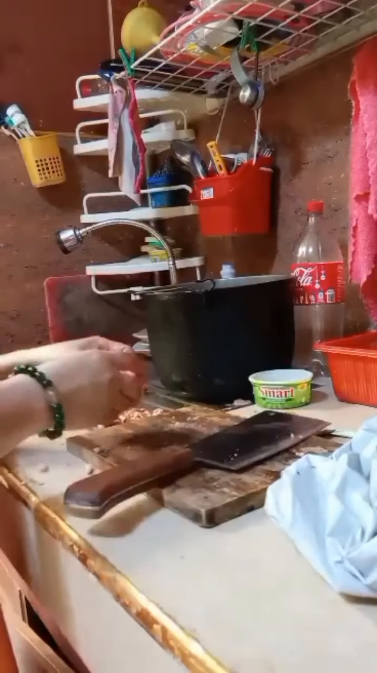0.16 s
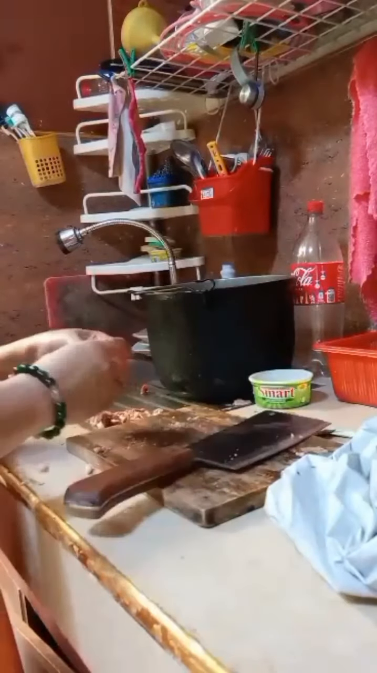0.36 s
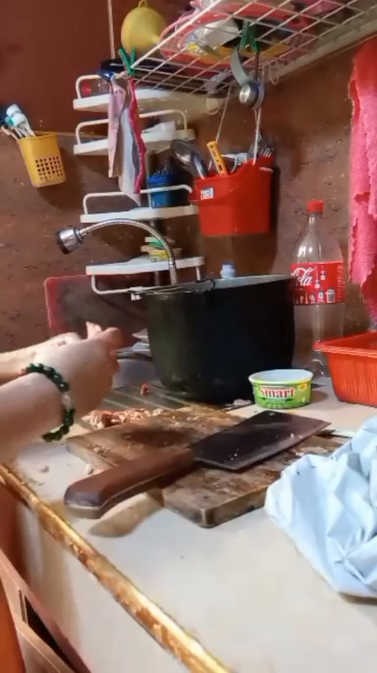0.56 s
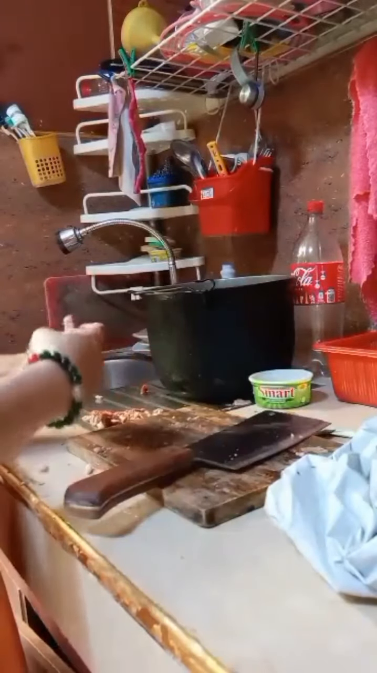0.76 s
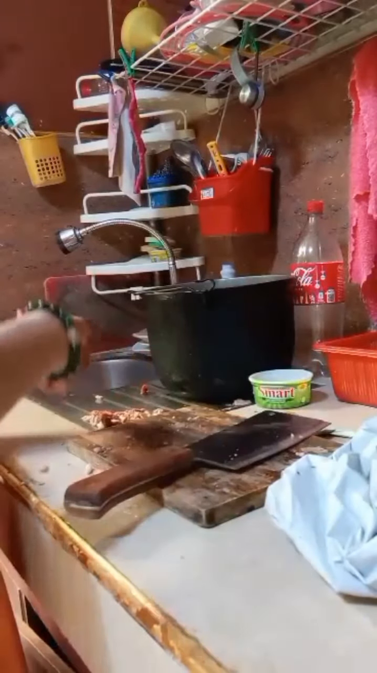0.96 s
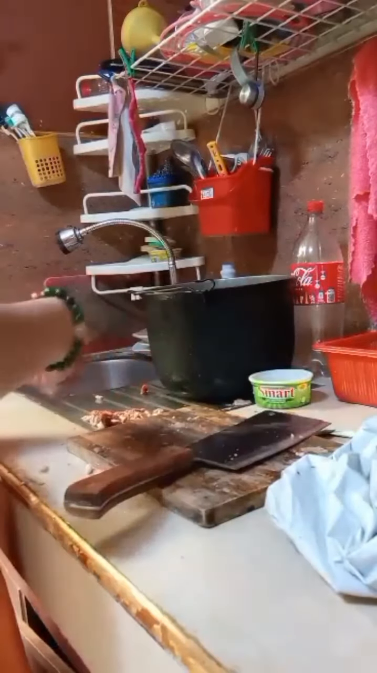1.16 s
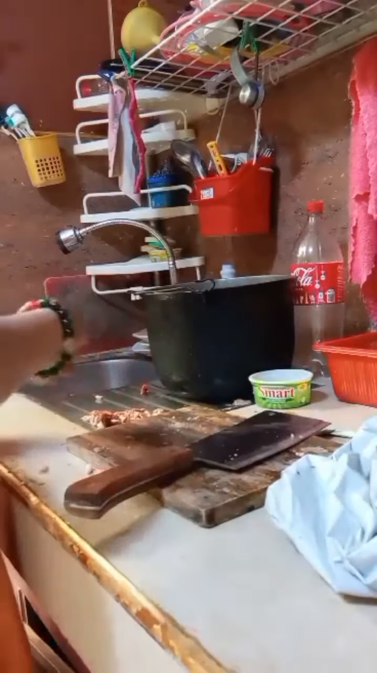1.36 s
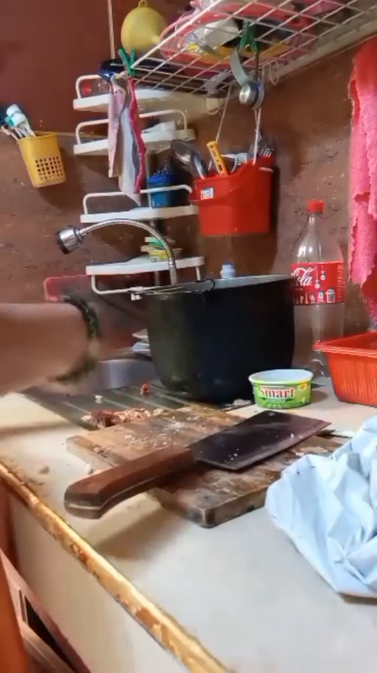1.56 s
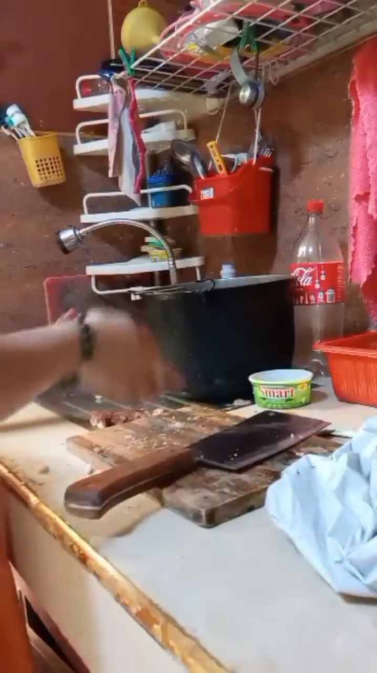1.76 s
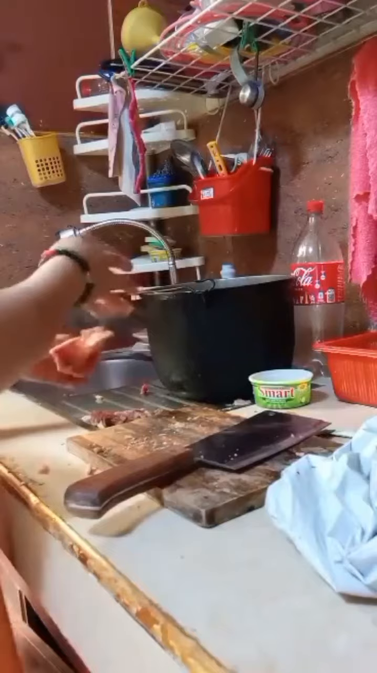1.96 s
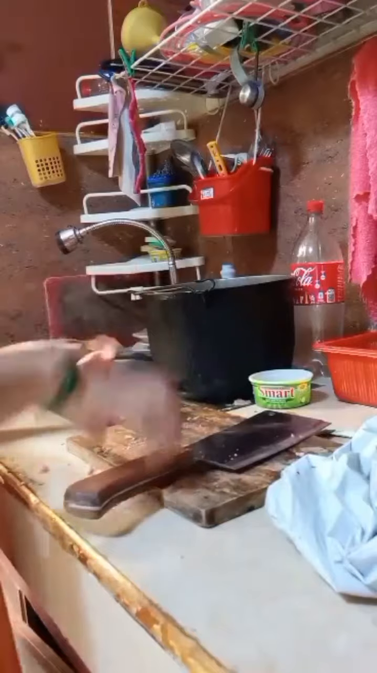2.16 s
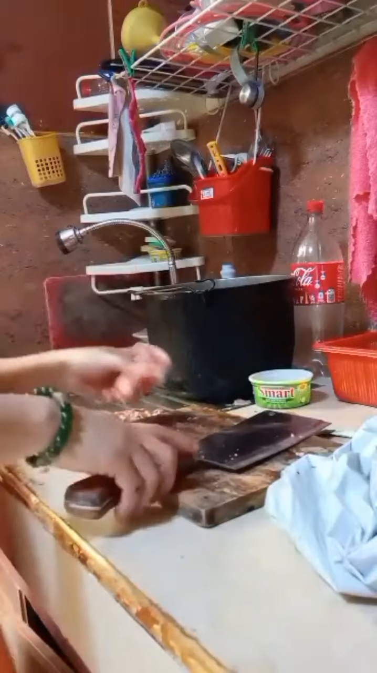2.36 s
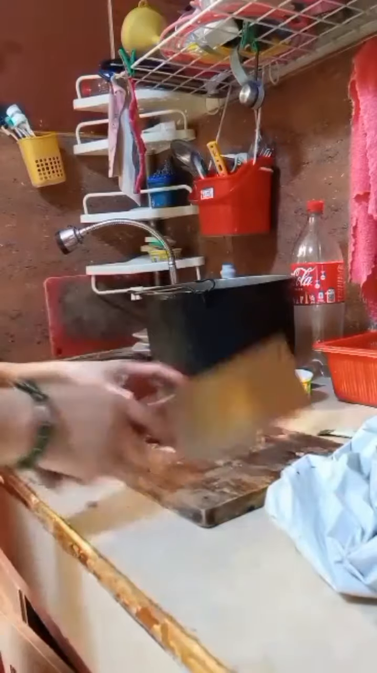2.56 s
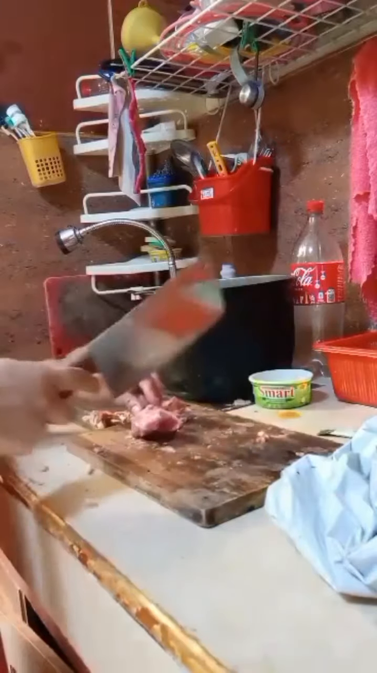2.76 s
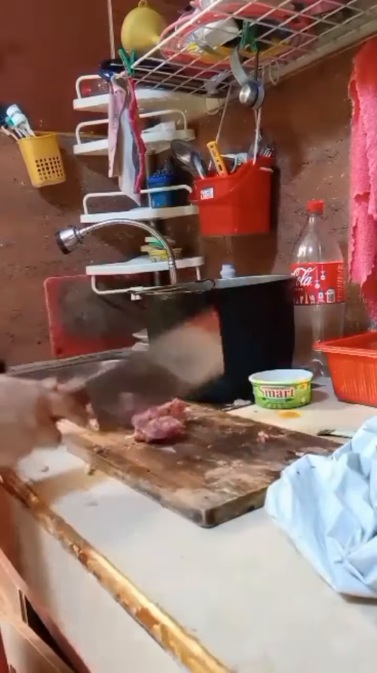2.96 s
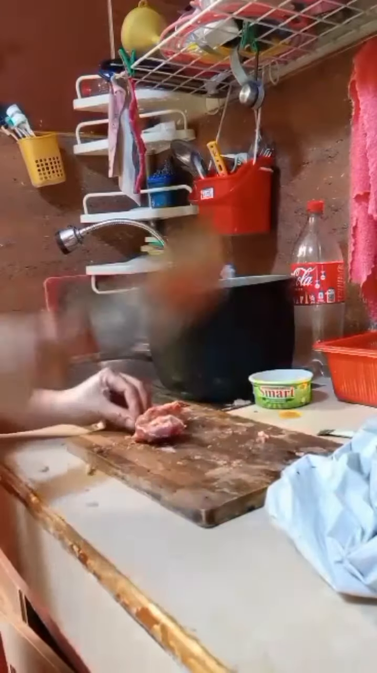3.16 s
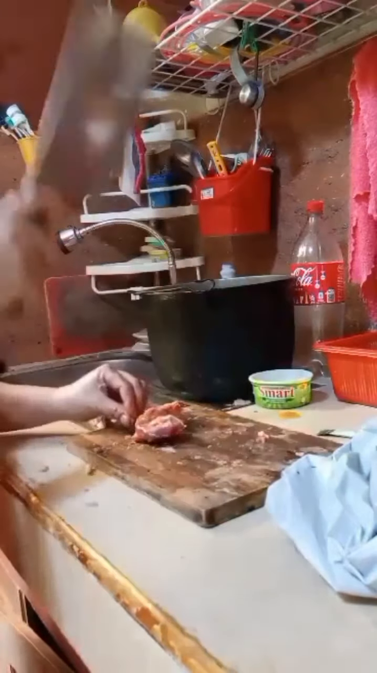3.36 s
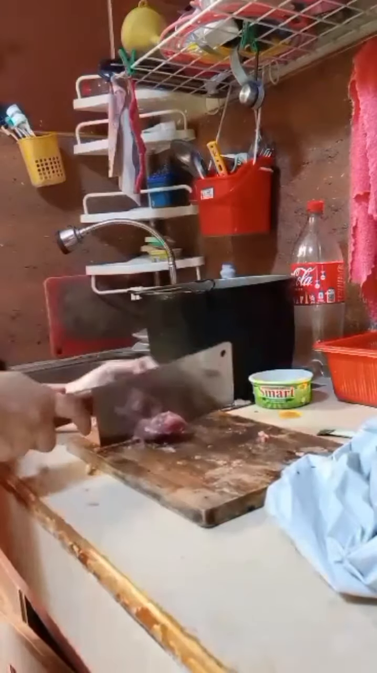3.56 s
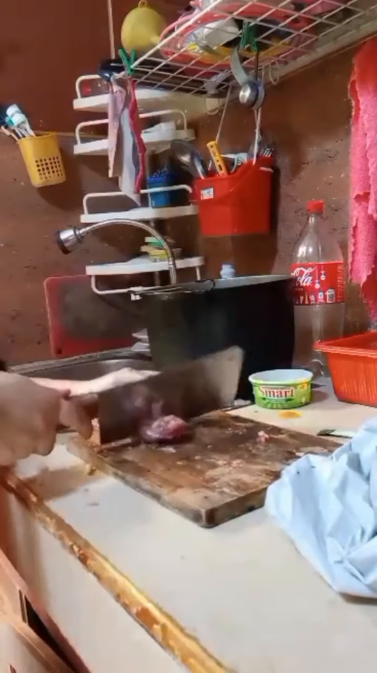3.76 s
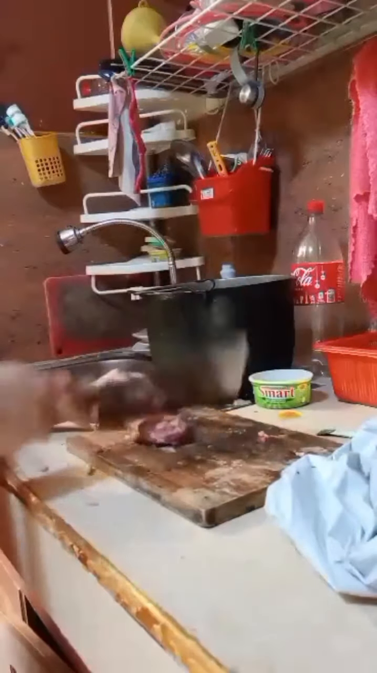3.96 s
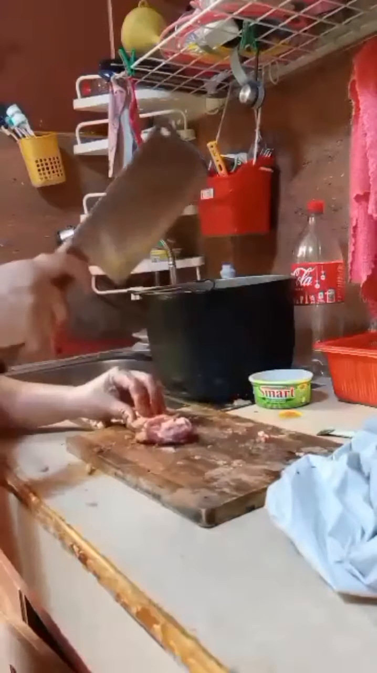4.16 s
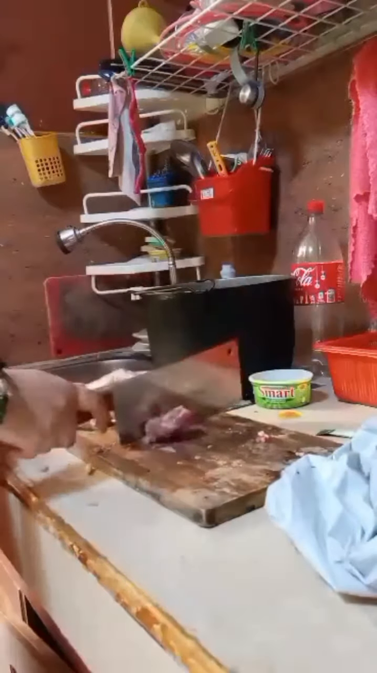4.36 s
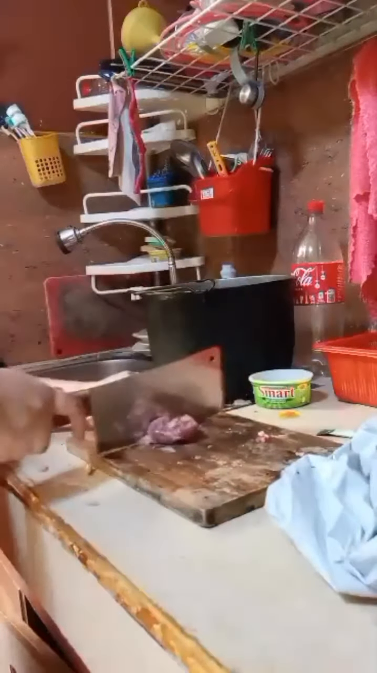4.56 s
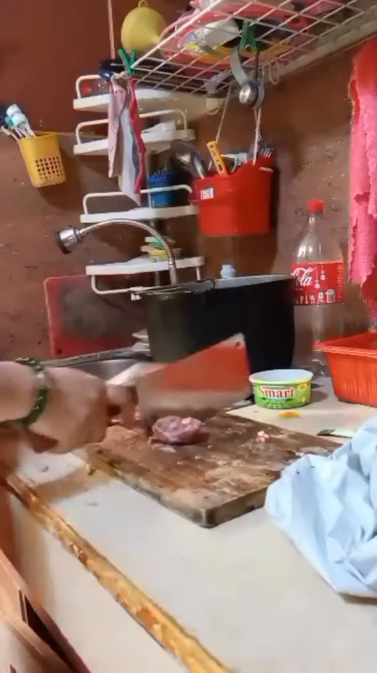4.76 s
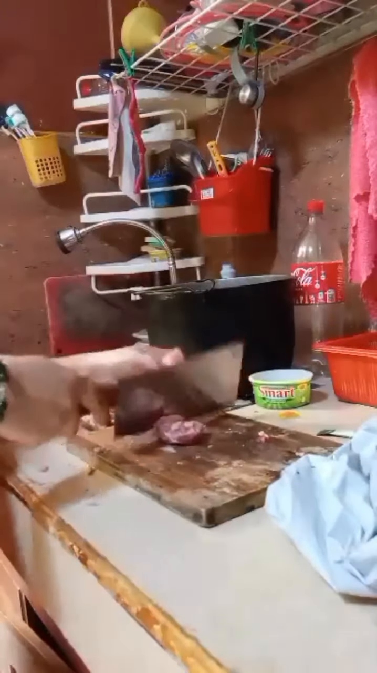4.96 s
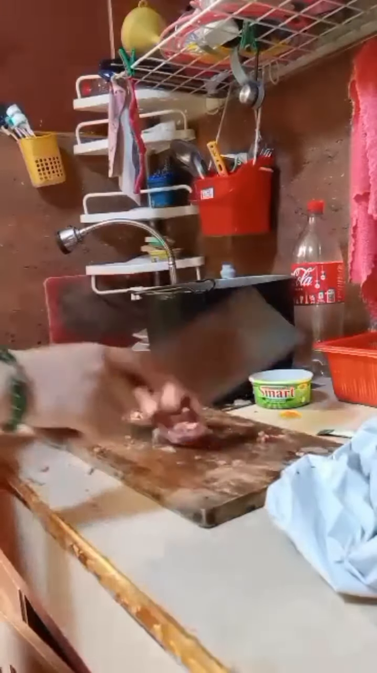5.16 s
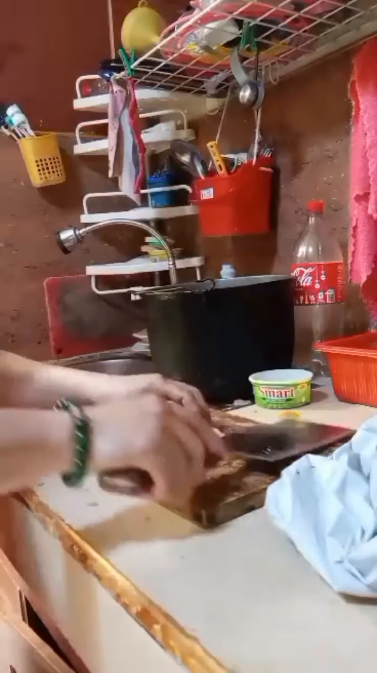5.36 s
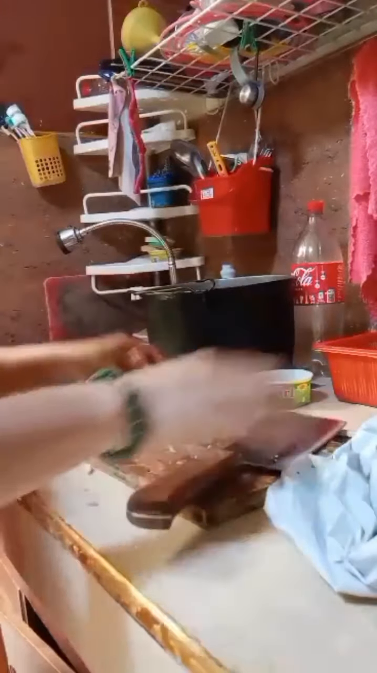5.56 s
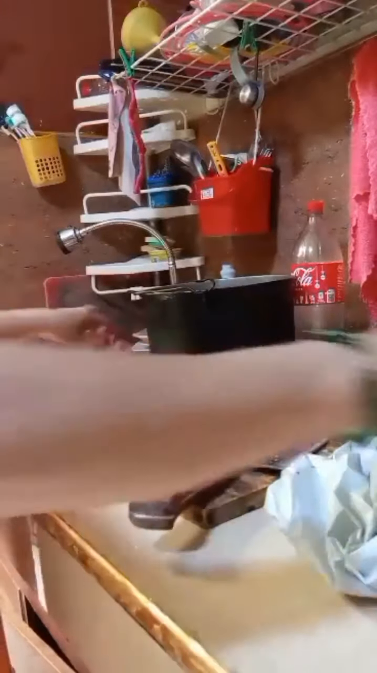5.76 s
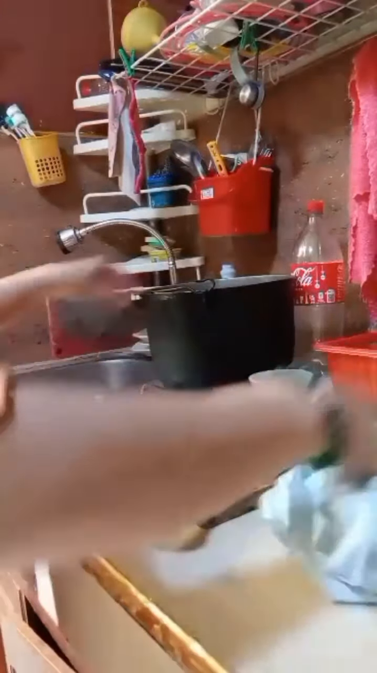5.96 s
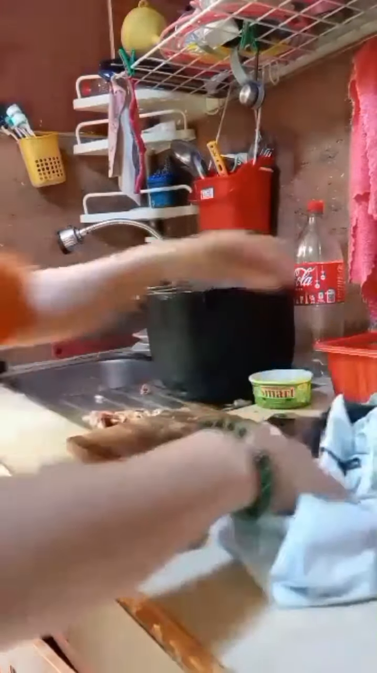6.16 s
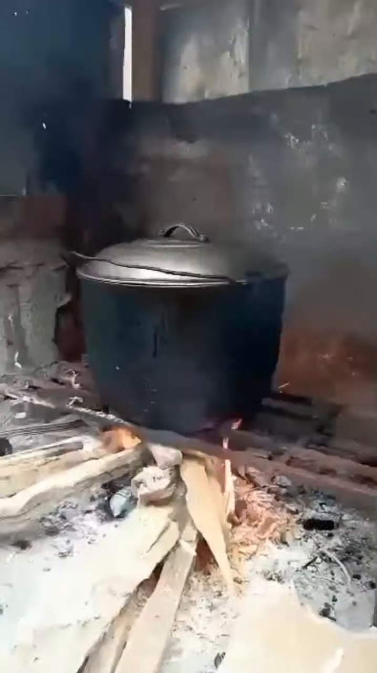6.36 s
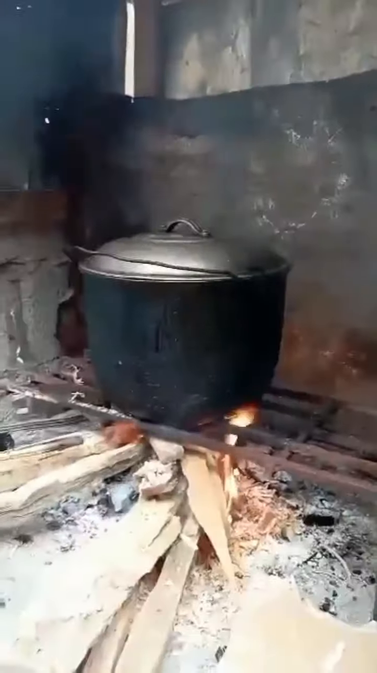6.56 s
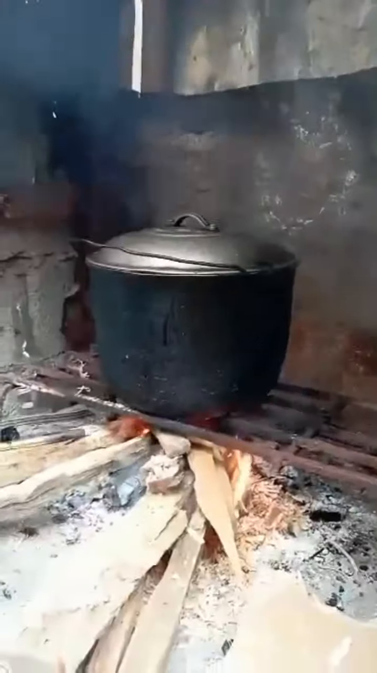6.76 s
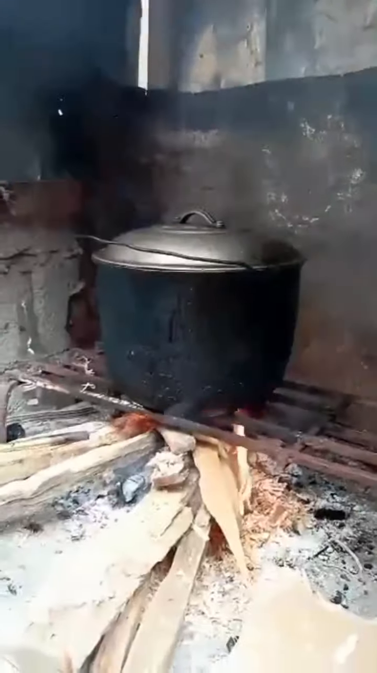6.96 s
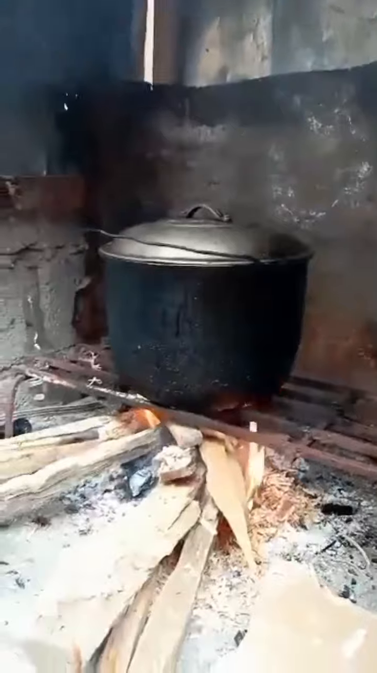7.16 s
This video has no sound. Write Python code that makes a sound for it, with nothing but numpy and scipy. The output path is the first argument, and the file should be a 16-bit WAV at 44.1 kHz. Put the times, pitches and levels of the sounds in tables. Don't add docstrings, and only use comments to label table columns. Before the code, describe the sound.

Quiet sticky handling and small clicks over low distant road rumble, heard close in a reflective kitchen. Two violent cleaver blows snap through meat and bone into a ringing board, the second slightly louder. Light scraping follows, then the cleaver clacks down and its blade rings brightly. Soft hollow bumps and crisp cloth rubbing end abruptly; a smooth, broad fire draught with faint whistles takes over.

```python
import sys
import numpy as np
from scipy import signal
from scipy.io import wavfile
from scipy.ndimage import uniform_filter1d, map_coordinates

SR = 44100
rng = np.random.default_rng(int(sys.argv[2]) if len(sys.argv) > 2 else 0)


def log_audio(samples):
    frames = np.atleast_2d(samples).T
    limited = np.clip(frames, -1, 1)
    pcm = np.round(limited * 32767).astype(np.int16)
    wavfile.write(sys.argv[1], SR, pcm)


def decibels_to_gain(level_db):
    exponent = np.asarray(level_db, float) / 20
    return 10 ** exponent


N = 318402
TIME = np.arange(N) / SR

# t/s, peak level/dB, wood/dB, knock/dB, crack/dB
CHOPS = [(0.016, -49, -35.5, -46, -36.5), (0.043, -26.5, -33, -21.5, -35), (3.581, -3, -19.5, -16, -7),
         (4.3774, -40, -19, -21, -18), (4.3842, -1, -13.5, -25, -16), (4.435, -31, -19, -35, -34),
         (4.451, -35.5, -30.5, -34, -26), (5.4496, -23.5, -37, -21.5, -20), (5.4619, -4, -34, -10, -12.5),
         (5.489, -28, -28.5, -39, -34), (5.631, -30, -29.5, -34.5, -53)]


def rms_one(x):
    return x / np.sqrt(np.mean(x ** 2) + 1e-20)


def in_time(rows, quiet=None):
    s, *columns = np.transpose(rows)
    return [np.interp(TIME, s, c, quiet, quiet) for c in columns]


def at_hz(points, hz):
    point_hz, level_db = np.transpose(points)
    return np.interp(np.log(hz), np.log(point_hz), level_db)


def swell(s, peak_db, rise, fall):
    return peak_db - 20 * np.where(TIME < s, (s - TIME) / max(rise, .003), (TIME - s) / max(fall, .003))


def drift(rate):
    r = np.exp(-80 * np.pi * rate / SR)
    slow = signal.lfilter([1], [1, -2 * r, r * r], rng.standard_normal(N // 40 + 2002))[2000:]
    return np.interp(np.arange(N) / 40, np.arange(len(slow)), rms_one(slow))


def clicks(times, sizes):
    out = np.full(N, 1e-18)
    np.add.at(out, (np.asarray(times) * SR).astype(int), sizes)
    return out


def ring(x, hz, t60):
    r, w = decibels_to_gain(-60 / (t60 * SR)), 2 * np.pi * hz / SR
    return signal.lfilter([0, np.sin(w)], [1, -2 * r * np.cos(w), r * r], x)


def die_away(x, t60):
    return signal.lfilter([1], [1, -decibels_to_gain(-60 / (t60 * SR))], x)


def narrow_band(x, hz, width_hz):
    r, w = np.exp(-np.pi * width_hz / SR), 2 * np.pi * hz / SR
    return signal.lfilter((1 - r * r) / 2 * np.array([1, 0, -1]), [1, -2 * r * np.cos(w), r * r], x)


def streaky(spread_db, width_hz, length_s):
    hz, s, cells = signal.stft(rng.standard_normal((2, N)), SR, nperseg=1024)
    places = np.meshgrid(hz / width_hz, s / length_s, indexing="ij")
    field = map_coordinates(rng.standard_normal((700, 400)), places, order=1)
    gain = decibels_to_gain(spread_db * np.clip(field, -3, 1.8))
    return signal.istft(cells * gain, SR, nperseg=1024)[1][:, :N]


def bands(source):
    for k, hz in enumerate(40 * 2 ** np.arange(1 / 6, 8.6, 1 / 3)):
        edges = hz * 2 ** (np.array([-1, 1]) / 6)
        yield hz, signal.sosfilt(signal.butter(2, edges, "band", fs=SR, output="sos"), source[k % 2])


def coloured(source, spectrum, patchy_db, rate):
    steep = [(10, -90)] + list(spectrum)
    return [(hz, decibels_to_gain(at_hz(steep, hz) + patchy_db * drift(rate)) * x) for hz, x in bands(source)]


def between(layers, low_hz, high_hz):
    return rms_one(sum(x for hz, x in layers if low_hz < hz < high_hz))


def blows():
    # f/Hz, with the thud first
    colour_hz = [140, 500, 1900, 6500, 13000]
    # f/Hz, blade laid down/dB, first chop/dB, second chop/dB, t60/s
    board = [(137.1, 11, 16.5, 11, 0.46), (254, 1.5, -1.5, -0.5, 0.4), (367, -16, -11, 1, 0.5),
             (420.5, -21, -13.5, -2.5, 0.44), (483.7, -16, -18, -9, 0.27), (629, -8.5, -9.5, 1.5, 0.4),
             (644, -9, -8.5, -4, 0.53), (738, -6, 1.5, -1, 0.46), (852, 0, -11.5, -9.5, 0.3),
             (1020, 1, -3, -12, 0.29), (760, -7, -2.5, -5, 0.4), (1150, -7, -10.5, -1, 0.16),
             (1453, -3, 0, -1.5, 0.15)]
    # f/Hz, level/dB, t60/s
    gripped = [(1674, -17, 0.04), (2630, -9, 0.17), (3480, -6.5, 0.31), (4930, -20, 0.13), (5850, -8, 0.15),
               (6640, -8, 0.3)]
    # f/Hz, first laid down/dB, first chop/dB, second chop/dB,
    # second laid down/dB
    spots = [(201, 3, -1.5, -3, -4), (349.6, 3, 0.3, 2, 1.7), (552.5, -5, -3.5, 0, 0.8),
             (900, 3.5, 1.5, -2.5, 1), (1500, -5, -0.5, 2, -1), (2750, 0, 0.8, -0.5, 0.2),
             (8000, -2, -0.7, 0.7, 0.5), (12600, -4, -1, -5.5, -8.5)]
    # f/Hz, t60/s
    room = [(100, 0.58), (300, 0.41), (1000, 0.53), (3000, 0.54), (7000, 0.48), (12000, 0.29)]
    # f/Hz, level of each third-octave band/dB before scaling by 0.42
    tail_colour = [(53, -52), (90, -24.5), (134, 8), (277, -13), (420, -8), (517, -26), (610, 5),
                   (1010, -17), (6540, -28), (13000, -59.5)]
    s, peak_db, wood_db, knock_db, crack_db = np.transpose(CHOPS)
    s = s + .0012
    spot = np.searchsorted([3, 4, 5], s)
    thud_db = wood_db - 13
    air_db = crack_db + 0.48 * (crack_db - knock_db) + 0.5
    colours = np.transpose([thud_db, wood_db, knock_db, crack_db, air_db])
    spot_hz, *spot_db = np.transpose(spots)

    def colour(hz):
        return np.array([np.interp(np.log(hz), np.log(colour_hz), row) for row in colours])

    def tint(hz):
        return np.array([np.interp(np.log(hz), np.log(spot_hz), c) for c in spot_db])[spot]

    snap = clicks(s + .0015, -decibels_to_gain(peak_db - 5.5))
    snap = signal.sosfilt(signal.butter(2, 8000, fs=SR, output="sos"), snap)
    out = ring(snap, 6460, 0.0032) + 0.14 * ring(snap, 1300, 0.0056) + 0.099 * ring(snap, 2700, 0.0033)

    modes = board + [(hz, db, db, db, t60) for hz, db, t60 in gripped]
    for hz, *levels_db, t60 in modes:
        chance_db = rng.normal(0, 1.0, len(s))
        sizes = decibels_to_gain(colour(hz) + np.array(levels_db)[spot % 3] - 19.0 + chance_db)
        out += ring(clicks(s, sizes), hz, t60)

    for hz, noise in bands(streaky(spread_db=3.5, width_hz=70, length_s=.12)):
        room_db = at_hz(tail_colour, hz)
        strike = clicks(s, decibels_to_gain(colour(hz) + tint(hz) + 0.42 * room_db))
        noise = rms_one(noise) * decibels_to_gain(1.84 * drift(31))
        crack = die_away(strike, 0.028 + 4.9 / hz)
        tail = die_away(strike, at_hz(room, hz))
        tail = np.maximum(decibels_to_gain(-16.5) * tail - decibels_to_gain(-85.0), 0)
        rise = uniform_filter1d(decibels_to_gain(-17.0) * crack + tail, size=61, origin=30)
        left_over = decibels_to_gain(-52.5 + .5 * room_db - 470.0 * TIME)
        out += noise * (rise + left_over)
    return out


def blade():
    # t/s, peak level/dB, brightness/dB per octave
    touches = [
        (.045, -42.5, -5),
        (5.465, -31, -11),
        (5.497, -52.5, 3),
        (5.53, -52.5, 3),
        (5.633, -51, -5),
    ]
    # f/Hz, first laid down/dB, second laid down/dB, t60/s
    free_modes = [(1674, -7, -32, 0.15), (2750, -20, -14, 0.26), (3300, -19, -21, 0.66),
                  (4900, -23, -21, .2), (5370, -19, -12, 0.42), (6300, -8, -17.5, 0.33),
                  (6560, -22, -11, .35), (7160, -6, 1, 0.25), (7900, -2, 6, .22), (9830, -7.5, 2, 0.26),
                  (13500, -28, -9, 0.2)]
    # t/s, level/dB
    beating = [
        [(.045, -62), (.078, -45.5), (.1, -48), (.133, -74), (.152, -56), (.25, -63), (.27, -86), (.29, -70),
         (.36, -88)],
        [(5.462, -50), (5.485, -30.5), (5.511, -43.5), (5.53, -39), (5.567, -54), (5.583, -38), (5.743, -55.5),
         (5.88, -82)],
    ]
    # t/s, level/dB, rise/s and fall/s per 20 dB
    overtone_swells = [
        (.048, -64, .004, 0.27),
        (5.468, -43, .004, 0.2),
    ]
    clink_s = 2.645, 5.1
    # f/Hz, first clink/dB, second clink/dB, t60/s
    clink_modes = [(1310, -56.5, -71, 0.37), (1560, -63, -76, .12), (2000, -79, -58.5, 0.082),
                   (2840, -75, -61, 0.11), (3300, -54.5, -67, 0.15), (3494, -62, -78, 0.37), (4870, -65, -67, 0.25),
                   (5303, -68, -59.5, 0.23), (6600, -43, -65, 0.074), (6234, -59, -72, 0.24),
                   (7150, -61, -81, 0.36), (7950, -60, -65, 0.3), (9870, -70, -68.5, 0.17), (10760, -58, -68, 0.17)]
    s, peak_db, slope = np.transpose(touches)
    waver = [decibels_to_gain(2.5 * drift(30)) for _ in range(5)]
    out = np.zeros(N)
    for k, (hz, first_db, second_db, t60) in enumerate(free_modes):
        level_db = peak_db + np.where(s < 3, first_db, second_db) + slope * np.log2(hz / 2132)
        out += waver[k % 5] * ring(clicks(s, decibels_to_gain(level_db)), hz, t60)
    note = sum(decibels_to_gain(in_time(rows, quiet=-140)[0]) for rows in beating) * waver[1] ** .25
    out += np.sqrt(2) * note * np.sin(2 * np.pi * 2145 * TIME)
    overtone = sum(decibels_to_gain(swell(*row)) for row in overtone_swells) * waver[2]
    out += np.sqrt(2) * overtone * np.sin(2 * np.pi * 3516 * TIME + 3 * np.log(waver[3]))
    for k, (hz, *peaks_db, t60) in enumerate(clink_modes):
        out += waver[k % 5] * ring(clicks(clink_s, decibels_to_gain(peaks_db)), hz, t60)
    return out


def taps():
    # t/s, peak level/dB, f/Hz, t60/s
    swings = [(0.799, -56, 2130, 0.046), (1.049, -56, 2000, .02), (1.061, -56, 1970, .02),
              (2.631, -55, 454, 0.043), (2.646, -52, 1000, 0.11), (2.605, -57, 2220, .03),
              (2.598, -62, 3200, .02), (2.852, -68, 4680, .07), (2.732, -62, 3200, .03),
              (3.582, -19.5, 1000, 0.035), (3.5847, -17.5, 6650, 0.0078), (3.5868, -17.5, 5850, .012),
              (3.5828, -23.5, 720, 0.05), (4.3791, -19, 930, 0.0097), (4.386, -9.5, 1120, 0.0063),
              (4.3887, -23, 726, 0.076), (4.4528, -22, 603, .07), (4.4537, -28, 725, .07),
              (4.731, -44, 1200, .03), (4.753, -44.5, 1310, 0.036), (4.774, -47, 1200, .03),
              (4.786, -45, 1190, 0.037), (4.937, -48, 1180, 0.017), (4.946, -57, 1150, .025),
              (4.956, -50.5, 1280, 0.022), (5.288, -54.5, 1200, 0.024), (5.299, -57.5, 1250, 0.024),
              (5.384, -59, 1500, 0.022), (5.425, -51, 1300, 0.031), (5.437, -53, 1300, 0.023),
              (5.444, -56, 1200, 0.022), (1.019, -44.5, 6060, 0.0098), (1.5375, -58, 6500, .005),
              (1.564, -36, 6980, 0.0071), (6.022, -42, 2600, .01), (6.074, -44, 2880, .01),
              (6.127, -38, 4500, .005), (6.162, -33.5, 5500, .004), (6.235, -47, 1200, .012),
              (6.243, -48, 3000, .006), (6.29, -48, 3200, .006), (6.304, -54, 4570, 0.0046),
              (6.324, -41, 4500, 0.0089), (6.326, -45.5, 2000, 0.012), (6.335, -46, 3000, .006),
              (6.345, -55, 6000, 0.0062)]
    out, t = np.zeros(N), np.arange(3000) / SR
    for s, peak_db, hz, t60 in swings:
        out[int(s * SR):][:3000] -= decibels_to_gain(peak_db - 60 * t / t60) * np.sin(2 * np.pi * hz * t)
    return out


def knocks():
    # t/s, peak level/dB
    contacts = [
        (5.951, -18.5),
        (5.9554, -28.5),
        (5.986, -23),
        (6.035, -33.5),
        (6.065, -34),
    ]
    # f/Hz, level/dB, t60/s
    basket = [(133.5, -2, 0.1), (251.5, -10.5, 0.38), (381, -2.5, 0.24), (449.5, 4, 0.13), (490, 0, 0.1),
              (685, -13, 0.16), (914, -7, 0.05)]
    s, peak_db = np.transpose(contacts)
    push = signal.lfilter([1], [1, -1.8, .81], clicks(s, .008 * decibels_to_gain(peak_db)))
    push = signal.sosfilt(signal.butter(2, 90, "high", fs=SR, output="sos"), push)
    return sum(decibels_to_gain(level_db) * ring(push, hz, t60) for hz, level_db, t60 in basket)


def ticks():
    # t/s, peak level/dB, f/Hz, tail under peak/dB
    small_clicks = [(0.4209, -36, 5550, -10), (0.801, -54, 2510, -7), (1.0197, -52, 6060, -21),
                    (1.049, -48, 5820, -7), (1.064, -50, 6380, -14), (1.5375, -63, 6600, -14),
                    (1.567, -44.5, 7700, -4.5), (2.2656, -66.5, 3580, 2.5), (2.5528, -48.5, 5730, -7),
                    (2.564, -49, 4930, -11), (2.6452, -35, 6900, -34), (2.9278, -57, 5200, -6),
                    (2.97, -53, 5350, -7), (3.082, -36, 6300, -14.5), (3.1594, -39, 5590, -16.5),
                    (3.8975, -56, 5800, -21), (3.9152, -60, 6500, -17), (5.099, -45, 5130, -12),
                    (2.852, -64, 5070, -8), (3.021, -55, 6500, -12), (5.362, -57.5, 1490, -11),
                    (5.424, -58, 1990, -9), (5.896, -74, 2400, -9), (5.979, -37, 5900, -10),
                    (6.013, -38, 5050, 1), (6.1088, -31.5, 6000, -7.5), (6.1613, -33, 5490, -24),
                    (6.176, -31.5, 6500, -9.5), (6.2878, -32, 6050, -28), (6.3247, -38.5, 3800, -14),
                    (0.0163, -33.5, 9500, -18.5), (0.423, -40, 9050, -21), (0.9528, -66, 7500, -15),
                    (0.9907, -57, 7000, -18), (2.574, -46, 5500, -8), (2.767, -53.5, 5700, -11),
                    (4.0819, -60.5, 5930, -10), (4.7308, -42, 4000, -23), (5.091, -65, 9040, -27),
                    (5.2486, -64.5, 5500, -14), (5.307, -58.5, 5500, -13), (5.364, -53.5, 5200, -13),
                    (5.426, -52, 5000, -16), (5.633, -45, 7000, -18), (5.927, -43, 5550, -14),
                    (5.959, -36, 5000, -19)]
    out, t = np.zeros(N), np.arange(5000) / SR
    for s, peak_db, hz, tail_db in small_clicks:
        fade = decibels_to_gain(-60 * t / 0.0082) + decibels_to_gain(tail_db - 60 * t / 0.3)
        burst = rng.standard_normal(5000) * fade
        edges = [0.37 * hz, min(1.38 * hz, 12500)]
        wide = signal.sosfilt(signal.butter(2, edges, "band", fs=SR, output="sos"), burst)
        out[int(s * SR):][:5000] += decibels_to_gain(peak_db - 6.5) * (wide + .3 * ring(burst, hz, 9.0 / hz))
    return out


def hands():
    # t/s, hiss level/dB, rise/s and fall/s per 20 dB, weight as rub over hiss/dB
    strokes = [(0.31, -73.5, 0.036, 0.14, 0.5), (0.42, -76, 0.0089, 0.25, -40),
               (0.54, -65.5, 0.19, 0.13, -21), (0.834, -69.5, 0.31, 0.25, -9.5),
               (1.072, -58, 0.11, 0.099, -19), (1.567, -55.5, 0.032, 0.096, -32),
               (2.2, -104, 0.39, 0.54, 12.5), (2.274, -86, 0.024, 0.13, 4),
               (2.562, -61, 0.0073, 0.25, -3.5), (2.653, -57.5, 0.07, 0.066, 1.5),
               (3.008, -77.5, 0.14, 0.11, 0), (3.083, -59, 0.0067, 0.097, -3),
               (3.8, -68.5, .05, 0.26, -0.5), (3.905, -57, 0.11, 0.12, -6.5), (4.6, -58, 0.054, 0.015, -3),
               (1.33, -86, 0.043, 0.78, -22.5), (5.102, -70.5, 0.016, 0.13, -1),
               (5.26, -79.5, 0.024, 0.27, 4), (5.396, -79, 0.096, 0.31, 0),
               (5.901, -59.5, 0.0036, 0.67, -8), (5.977, -52, 0.038, 0.2, 5.5), (6.1, -43.5, 0.13, 0.17, 0),
               (6.3, -59.5, 0.17, 0.14, -5)]
    # f/Hz, level/dB per Hz
    smear = [(200, -9), (430, -3), (840, -1.5), (1300, -4), (2500, -8.5), (4200, -9.5), (6400, -5),
             (8000, -10), (9700, -16.5), (11500, -25.5), (13300, -27.5)]
    # t/s, level/dB, rise/s and fall/s per 20 dB
    scrapes = [
        (4.754, -50, 0.19, 0.0936),
        (4.96, -55, 0.17, 0.08),
    ]
    grains = decibels_to_gain(3.5 * np.minimum(rng.exponential(1, N), 2)) * (rng.random(N) < 330 / SR)
    grains = die_away(grains, 0.0055)
    source = rms_one(streaky(spread_db=4.6, width_hz=70, length_s=.07)) * (1.5 + grains)
    layers = coloured(source, smear, patchy_db=1.3, rate=14)
    air, hiss = between(layers, 8000, SR), between(layers, 3500, 8000)
    rub, body = between(layers, 1100, 3500), between(layers, 200, 1100)
    air_db = -10.5
    out = np.zeros(N)
    for *stroke, weight_db in strokes:
        lows = decibels_to_gain(weight_db) * rub + decibels_to_gain(-4.5 + 2.35 * weight_db) * body
        highs = hiss + decibels_to_gain(air_db - 0.315 * weight_db) * air
        out += decibels_to_gain(swell(*stroke)) * (highs + lows)
    wood = rms_one(ring(rub + body, 1200, 0.024))
    edge = hiss + decibels_to_gain(air_db) * air + decibels_to_gain(-3) * rub + decibels_to_gain(-19.5) * wood
    return out + sum(decibels_to_gain(swell(*row)) for row in scrapes) * edge


def singing():
    # f/Hz, t/s, level/dB, rise/s and fall/s per 20 dB
    sung_strokes = [(9500, 0.45, -74.5, 0.19, 0.16), (9130, 0.77, -73.5, .2, 0.18),
                    (9500, 1, -70, 0.1, -0.34), (5900, 1, -68, 0.019, 0.26),
                    (1250, 2.69, -64.5, 0.06, 0.15), (2600, 4.77, -63, 0.092, 0.4),
                    (3200, 4.76, -57.5, .1, 0.34), (650, 4.58, -57, 0.12, 0.18),
                    (2000, 5.26, -73, 0.026, 0), (5000, 5.31, -78, 0.049, 1),
                    (5340, 5.38, -75, 0.061, -0.5), (1300, 6.11, -58, 0.081, -0.1)]
    noise, out = rng.standard_normal(N), np.zeros(N)
    for hz, *stroke in sung_strokes:
        t60 = 10 / hz
        out += decibels_to_gain(swell(*stroke)) * rms_one(ring(ring(noise, hz, t60), hz, t60))
    return out


def howl():
    # t/s, pitch f/Hz, level/dB
    calls = [
        [(3.85, 433, -78), (3.87, 432, -59), (3.93, 453, -57), (4.03, 450, -63), (4.068, 462, -54),
         (4.188, 479, -61), (4.205, 484, -75), (4.274, 501, -57.5), (4.37, 510, -65.5)],
        [(6.16, 445, -55.5), (6.192, 453, -53), (6.198, 439, -53.5), (6.292, 427, -55.5), (6.31, 428, -53),
         (6.362, 428, -54), (6.37, 419, -57)],
    ]
    out = np.zeros(N)
    for rows in calls:
        hz, level_db = in_time(rows)[0], in_time(rows, quiet=-120)[1]
        turn = 2 * np.pi * np.cumsum(hz + 4.0 * drift(25)) / SR
        octave = decibels_to_gain(-17.5 + 1.5 * drift(8)) * np.sin(2 * turn + .4 * drift(30))
        out += np.sqrt(2) * decibels_to_gain(level_db + 2.6 * drift(32)) * (np.sin(turn) + octave)
    return out


def faint_tones():
    # t/s, length/s, f/Hz, level/dB
    faint_notes = [(0.488, 0.087, 493, -75.5), (0.596, 0.11, 1030, -64.5), (0.698, 0.071, 997, -68.5),
                   (0.68, 0.099, 704, -72.5), (0.982, 0.058, 1695, -62.5), (1.706, 0.089, 490, -76),
                   (1.952, .12, 734, -67.5), (2.257, 0.033, 630, -63), (2.304, 0.077, 620, -68.5),
                   (2.44, 0.19, 702, -78), (2.71, 0.13, 1288, -77), (3.28, 0.26, 1334, -80.5),
                   (4.09, 0.085, 1270, -77.5), (2.5, 0.062, 4130, -76), (0.52, 0.15, 2070, -78),
                   (2.055, 0.13, 650, -77), (2.1, 0.08, 814, -76.5), (2.286, 0.074, 437, -69),
                   (6.25, 0.15, 1300, -62.5)]
    wobble, out = drift(41), np.zeros(N)
    for s, length, hz, level_db in faint_notes:
        arch = np.sin(np.pi * np.clip((TIME - s) / length, 0, 1))
        tone = np.sin(2 * np.pi * hz * TIME + 0.7 * np.roll(wobble, 9000))
        out += decibels_to_gain(level_db + 3 + 3.5 * wobble) * arch * tone
    return out


def background():
    # t/s, level/dB
    road = [(0.0, -64), (0.16, -58.5), (0.43, -67), (0.74, -67), (2.02, -66), (2.22, -64.5), (3.41, -70),
            (3.76, -58.5), (4.12, -73.5), (4.4, -80), (4.54, -57), (4.68, -66), (5.23, -74.5), (5.45, -72),
            (5.64, -59), (5.94, -70.5), (6.23, -70.5), (6.37, -74)]
    # t/s, level/dB, rise/s and fall/s per 20 dB
    deep_swells = [(0.6, -58, 0.14, 1), (0.92, -52, 0.17, 0), (2.261, -45, 0.18, 0.27),
                   (2.4, -81, 0.29, -2.5), (2.68, -58.5, 0.42, 0.2), (2.92, -57, 0.14, -0.5),
                   (4.68, -56.5, 0.24, -1.55), (5.0, -60, 0.68, 0.2), (6.1, -50.5, 0.067, 0.1)]
    # f/Hz, level/dB per Hz
    floor_colour = [(200, 4), (330, -9), (700, -10.5), (1300, -12), (2400, -18.5), (4000, -24),
                    (6400, -26.5), (9700, -31.5), (13300, -35)]
    drone_db, = in_time(road)
    drone = rms_one(ring(ring(rng.standard_normal(N), 134, 0.096), 118, 0.084))
    hum = decibels_to_gain(-19) * rms_one(ring(rng.standard_normal(N), 358, .5))
    deep = rms_one(ring(ring(rng.standard_normal(N), 50, 0.012), 44, 0.0083))
    deep_gain = decibels_to_gain(-92.5) + sum(decibels_to_gain(swell(*row)) for row in deep_swells)
    hard = [row[0] for row in CHOPS if row[1] > -14]
    since = np.maximum(TIME - np.c_[hard], 0) / 0.64
    duck_db = 4 * np.sum(since * np.exp(1 - since), axis=0)
    source = streaky(spread_db=6.0, width_hz=180, length_s=0.079)
    floor = between(coloured(source, floor_colour, patchy_db=2.0, rate=17), 200, SR)
    return decibels_to_gain(drone_db + 3.6 * drift(25)) * (drone + hum) + deep_gain * deep + decibels_to_gain(-78.5 - duck_db) * floor


def rush():
    # t/s, level/dB
    strength = [(6.405, -68), (6.462, -56.5), (6.468, -46), (6.514, -41), (6.694, -33), (6.964, -35.5),
                (7.086, -34), (7.22, -35.5)]
    # f/Hz, level/dB per Hz
    draught_colour = [(29, -57), (50, -39), (113, -5), (161, -13), (198, 0.5), (400, 1.5), (620, -2.5),
                      (787, -2.5), (1090, -3), (1590, -10), (4140, -15.5), (4650, -23.5), (7590, -16.5),
                      (9820, -27), (13300, -73)]
    # f/Hz, width/Hz, level/dB, growth/dB per s
    whistles = [(472, 120, -9, 14), (1115, 85, -9, 21), (3410, 42, -18.5, -1), (4120, 250, -13.5, 37),
                (6153, 110, -22.5, -10), (7600, 59, -10, 32.5)]
    roar_db, = in_time(strength)
    source = streaky(spread_db=4.4, width_hz=45, length_s=.3)
    layers = coloured(source, draught_colour, patchy_db=.8, rate=9)
    draught = between(layers, 0, 2000) + decibels_to_gain(-4.5) * between(layers, 2000, SR)
    for hz, width_hz, level_db, growth_db in whistles:
        gain = decibels_to_gain(level_db + growth_db * (TIME - 7.0) + 3.14 * drift(8.0))
        draught += gain * rms_one(ring(rng.standard_normal(N), hz, 5.6 / width_hz))
    return decibels_to_gain(roar_db) * (draught - narrow_band(draught, 775, 86))


def scene():
    cut_s = 6.366, 6.405
    kitchen = blows() + blade() + taps() + knocks() + ticks() + hands() + singing()
    kitchen += howl() + faint_tones() + background()
    kitchen *= np.clip((cut_s[0] - TIME) / 0.00058, 0, 1)
    fire = rush() * np.clip((TIME - cut_s[1]) / 0.021, 0, 1)
    mid = kitchen + fire
    side = np.roll(mid, 90) * np.tanh(3 * drift(40))
    side = decibels_to_gain(-6) * signal.sosfilt(signal.cheby2(12, 80, 3800, "high", fs=SR, output="sos"), side)
    return np.array([mid + side, mid - side])


def band_limit(x):
    return signal.sosfilt(signal.butter(12, 13690, fs=SR, output="sos"), x)


def record(dry):
    # f/Hz, width/Hz, level/dB
    capsule = [(3240, 110, 1), (6405, 780, 2), (7810, 1800, -5.5), (9550, 370, 3)]
    for hz, width_hz, gain_db in capsule:
        dry = dry + (decibels_to_gain(gain_db) - 1) * narrow_band(dry, hz, width_hz)
    dry = signal.sosfilt(signal.butter(3, 62, "high", fs=SR, output="sos"), dry)
    dry = signal.sosfilt(signal.ellip(10, 1, 70, 13050, fs=SR, output="sos"), dry)
    return band_limit(dry)


dry = scene()
out = record(dry)
log_audio(out)
```